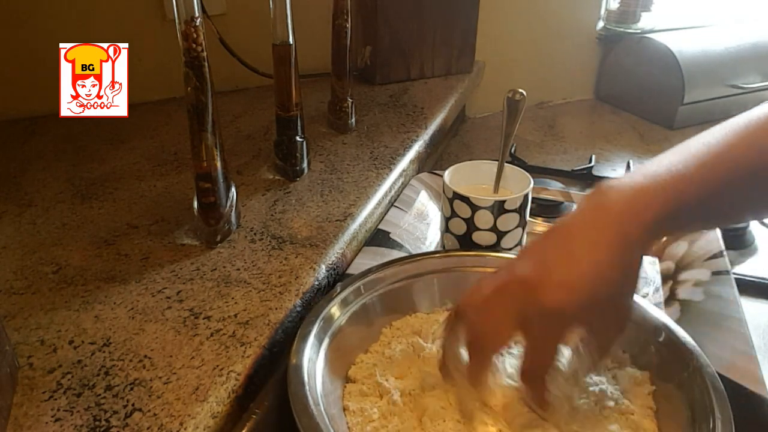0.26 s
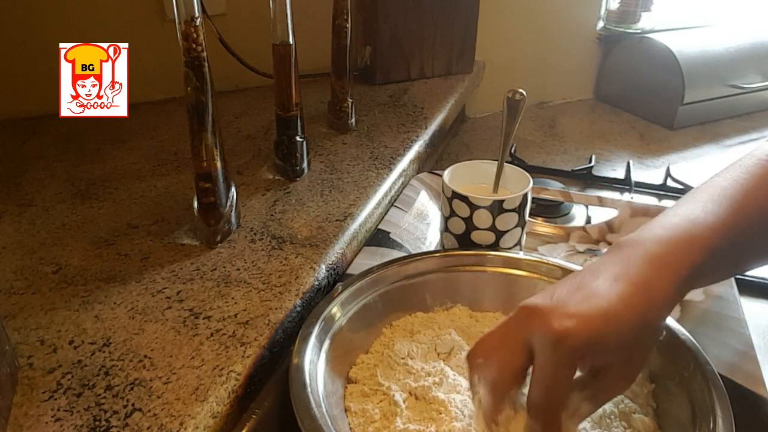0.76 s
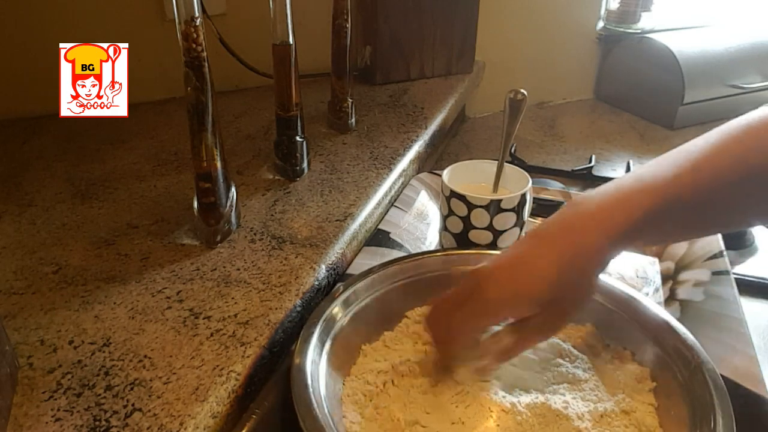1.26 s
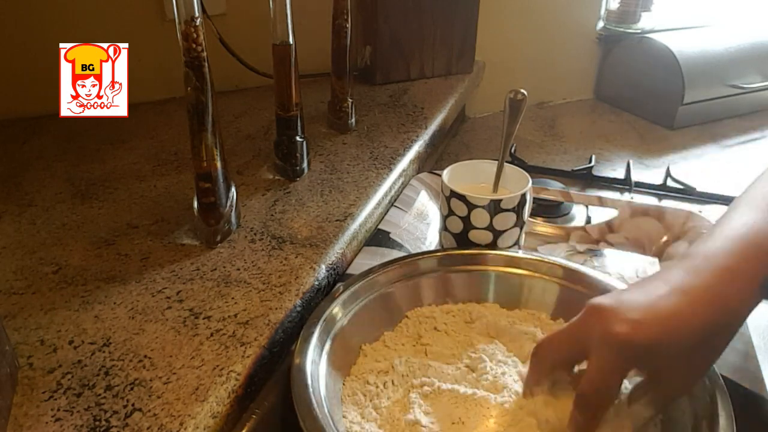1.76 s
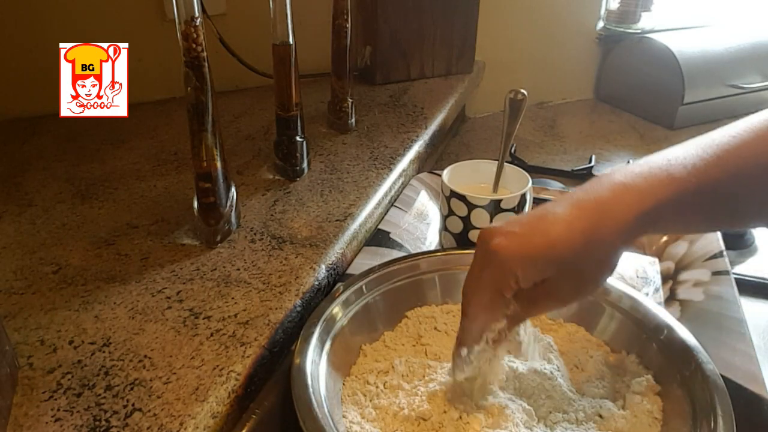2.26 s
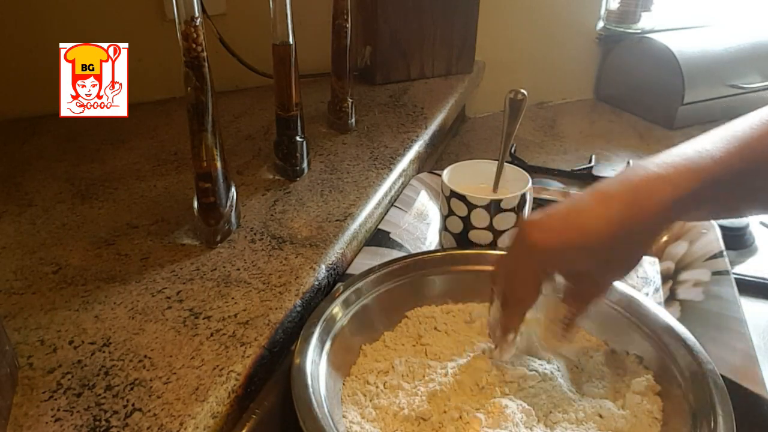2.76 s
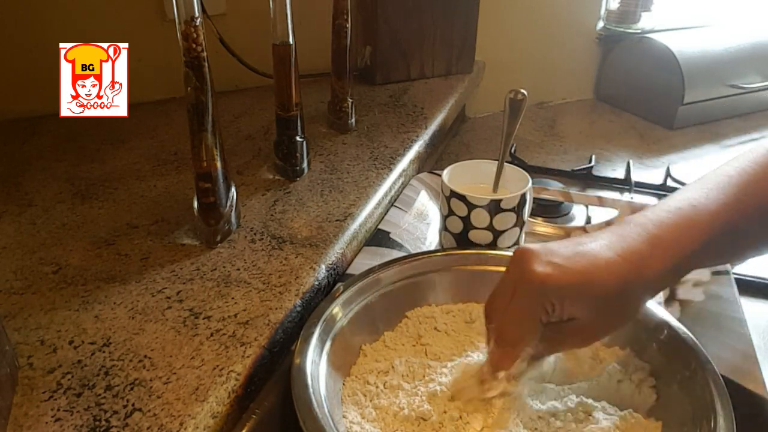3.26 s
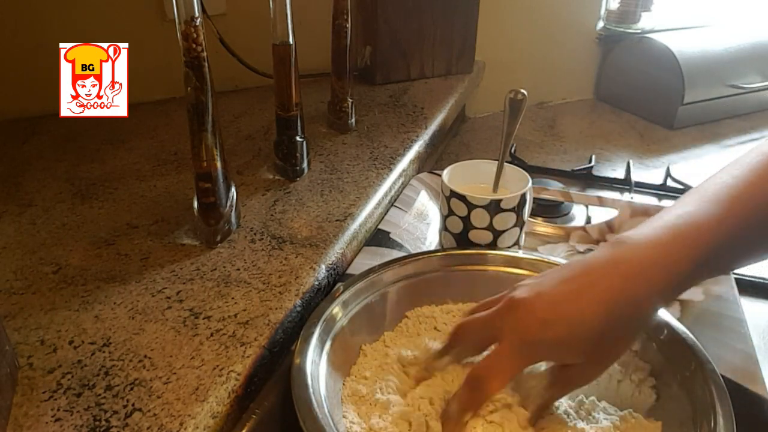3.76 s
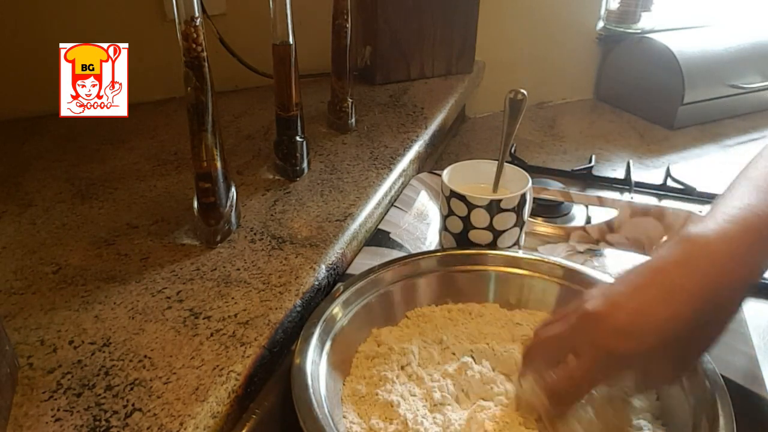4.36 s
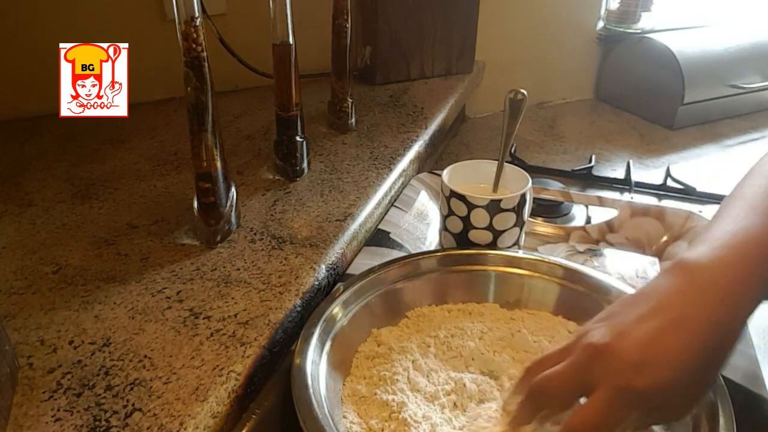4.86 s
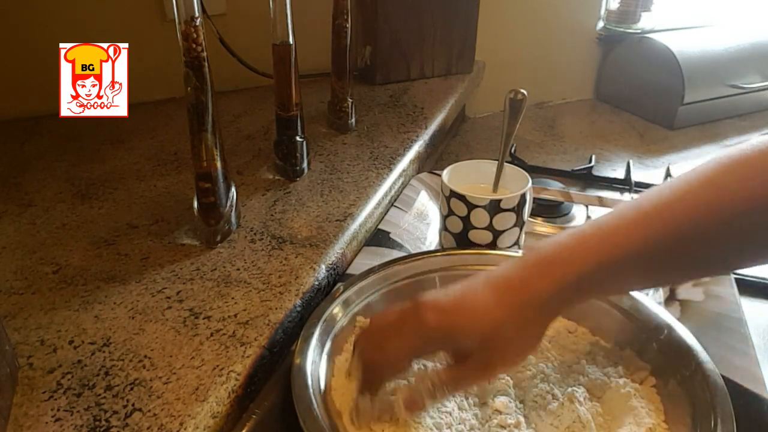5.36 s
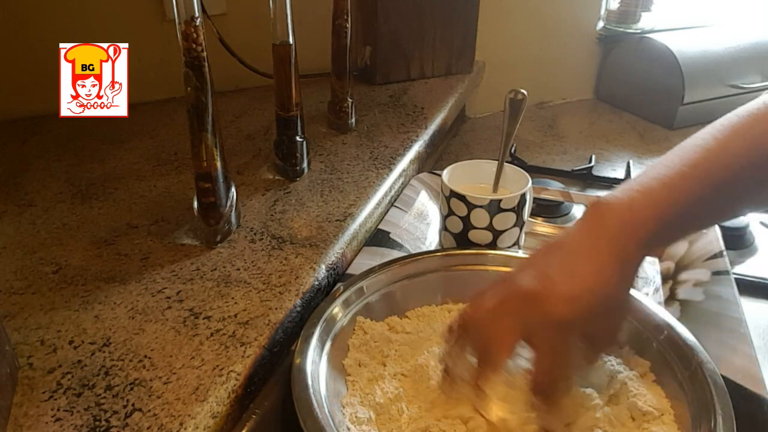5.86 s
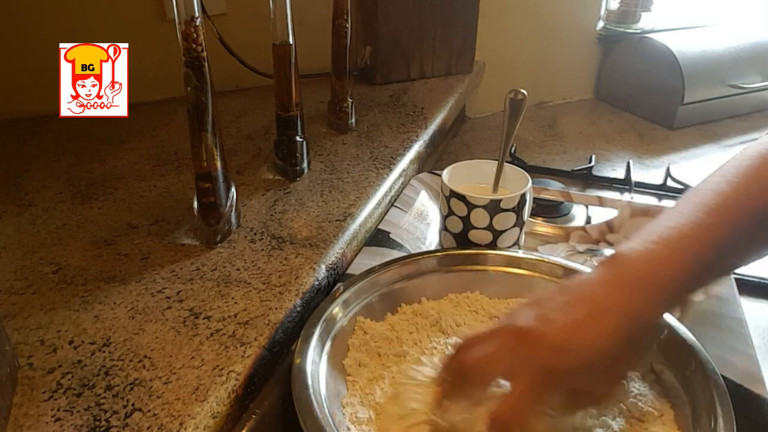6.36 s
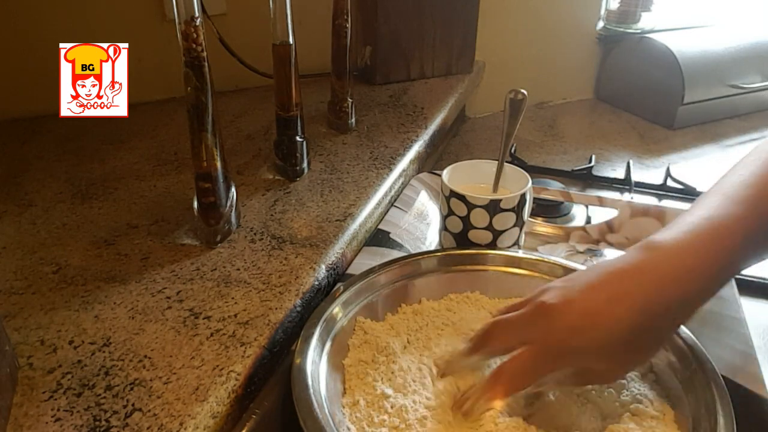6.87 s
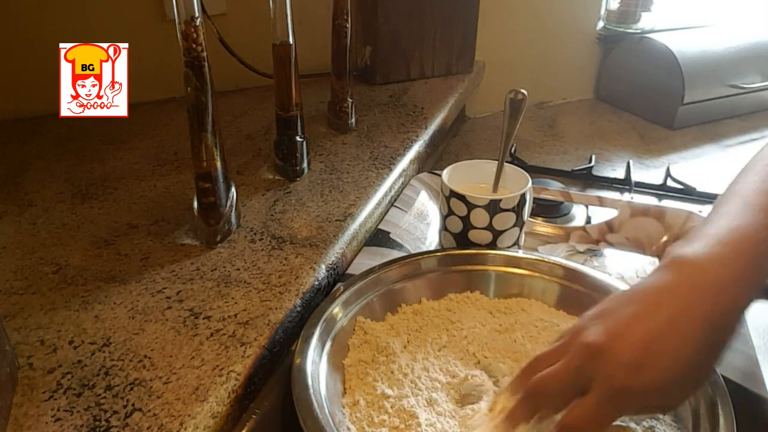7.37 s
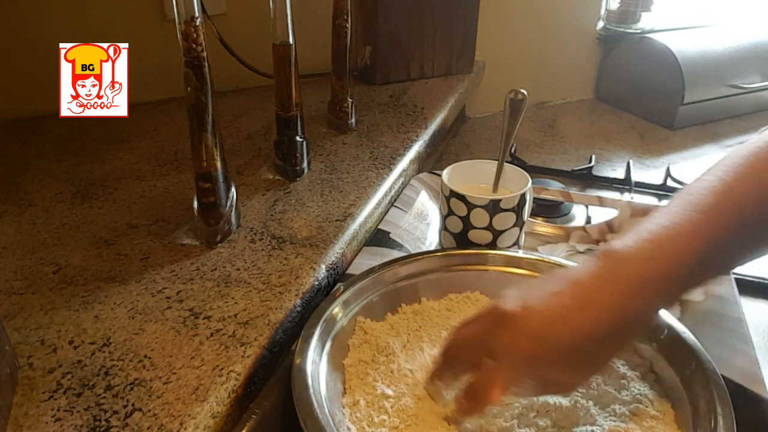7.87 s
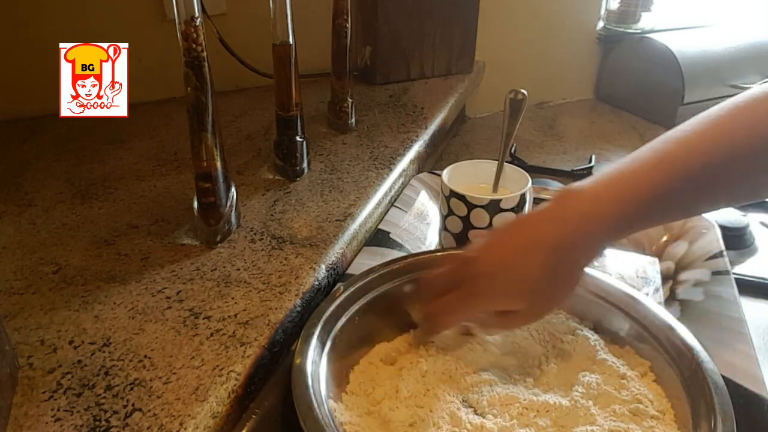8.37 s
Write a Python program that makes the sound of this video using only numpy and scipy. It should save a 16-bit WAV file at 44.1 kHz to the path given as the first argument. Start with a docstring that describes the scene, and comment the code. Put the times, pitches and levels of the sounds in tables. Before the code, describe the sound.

Fingers work dry flour in a damped metal bowl on a kitchen counter, close to a small stereo microphone. Early clanks and scrapes give way to a quiet gap with light brushing. Uneven rubbing then builds into busy, crisp, gritty surges, crumbs ticking on steel and the counter thudding softly, ending in firmer scrapes. A short room echo and low hum sit underneath.

```python
"""A kitchen counter: fingers rub fat into flour in a steel bowl, close to a small stereo microphone.
Flour hiss is coloured noise and crumb clicks; scrapes, knocks and skids ring decaying steel modes.
Crushed grit rasps under the nails and flicked crumbs ping the bowl. Pushes and the drag of the palm
ring low counter modes; shaped noise, a wavering low hum and room resonances lie underneath."""
import sys
import numpy as np
from scipy import signal
from scipy.fft import rfft, irfft, next_fast_len
from scipy.io import wavfile
from scipy.ndimage import uniform_filter1d

SR = 44100
rng = np.random.default_rng(int(sys.argv[2]) if len(sys.argv) > 2 else 0)


def wav_out(sig):
    """Save sig, one row per channel (or a flat mono array), as 16-bit PCM at SR to the path in sys.argv[1]."""
    wavfile.write(sys.argv[1], SR, np.round(np.clip(np.atleast_2d(sig).T, -1, 1) * 32767).astype(np.int16))


N = 379701  # length in samples
OPPOSITE = np.array([[1], [-1]])  # left and right move against each other


def undb(db):
    """dB to gain."""
    return 10 ** (np.asarray(db) / 20)


def level(x, db=0):
    """Set the rms level."""
    return x * undb(db) / np.sqrt(np.mean(x ** 2))


def colour(x, curve):
    """Shape the spectrum along (pitch_hz, level_db) points, joined on a log frequency axis."""
    hz, db = np.transpose(curve)
    size = next_fast_len(N)
    f = np.maximum(np.arange(size // 2 + 1) * SR / size, 1)
    gain = undb(np.interp(np.log(f), np.log(hz), db))
    return irfft(rfft(x, size) * gain, size)[..., :N]


def ring(x, hz, t60):
    """Drive one decaying mode; the result is a complex swing."""
    pole = np.exp((2j * np.pi * hz - np.log(1000) / max(t60, .003)) / SR)
    return signal.lfilter([1], [1, -pole], x)


def walk(rate):
    """Random levels held 1 / rate s and slewed twice; spread near 1."""
    k = int(SR / rate)
    steps = np.repeat(rng.standard_normal(N // k + 1), k)
    return 1.39 * uniform_filter1d(uniform_filter1d(steps, k), k)[:N]


LARGEST_GRAIN = 4.2  # cap on a grain's size, in spreads


def grains(rate, spread_db):
    """Random clicks of either sign, rate per second; a few are much larger than the rest."""
    fall, size, sign = rng.random(N), rng.exponential(size=N), rng.standard_normal(N)
    clicks = (fall < rate / SR) * sign
    return level(clicks * undb(spread_db * np.minimum(size, LARGEST_GRAIN)))


def pair(likeness):
    """Left and right noise that share part of their motion."""
    mid, side = rng.standard_normal((2, N))
    return mid * np.sqrt((1 + likeness) / 2) + side * np.sqrt((1 - likeness) / 2) * OPPOSITE


def sides(pan_db):
    """Left and right gains, pan_db apart."""
    return undb(np.array([pan_db, -pan_db]) / 2)


def ports(swing, k, hz):
    """Each lobed mode reaches the two microphone ports out of step, more so at higher pitch up to a cap."""
    turn = np.exp(.5j * (-1) ** k * min(hz / 330, 1.5))
    return np.array([(swing * turn).imag, (swing / turn).imag])


ROUND = 1.14  # above 1 the top of a swell is rounded


def swells(times, levels_db, swell_db):
    """Summed power, in dB, of events that rise, hold and fall."""
    power = np.full((levels_db.shape[1], N), 1e-18)
    for (s, rise, hold, fall), db in zip(times, levels_db):
        first = max(int((s - 3 * rise) * SR), 0)
        last = min(int((s + hold + 3 * fall) * SR), N)
        t = np.arange(first, last) / SR - s
        drop = (np.maximum(-t / rise, 0) + np.maximum((t - hold) / fall, 0)) ** ROUND
        power[:, first:last] += undb(2 * (db[:, None] - np.outer(swell_db, drop)))
    return 10 * np.log10(power)


# spectrum of the room air: pitch_hz, relative level_db (per Hz)
AIR_CURVE = [(18, -16), (34, -14), (48, -3.5), (103, -5.5), (194, -9.5), (287, -6.5), (426, -20),
             (666, -18), (962, -26.5), (1460, -25), (1910, -29.5), (2170, -26), (9460, -42), (14800, -33.5),
             (16000, -38)]
AIR_DB = -64.5  # rms before the slight pan
# low hum and room resonances: pitch_hz, waver_width_hz, rms level_db
LOW_TONES = [(46.7, 11, -65), (100.3, 4.8, -67), (164, 14, -72.5)]


def kitchen():
    """Room air, most alike left and right in the bass; noise rings the wavering low hum and room resonances."""
    mid, side = colour(rng.standard_normal((2, N)), AIR_CURVE) * undb(1.0 * walk(4.2))
    side = colour(side, [(60, -10.5), (250, -5.5), (1500, 1.0)])
    air = level(mid + side * OPPOSITE, AIR_DB) * sides(-1.1)[:, None]
    tones = 0
    for hz, width_hz, db in LOW_TONES:
        t60 = np.log(1000) / np.pi / width_hz  # a wider resonance dies sooner
        tones = tones + level(ring(rng.standard_normal(N), hz, t60).imag, db)
    return air + tones


# one row per swell of rubbing or of rattle after a knock: full_force_s, rise_s, hold_s, fall_s,
# then relative hiss level_db, steel contact level_db and brightness_db
HAND_SWELLS = [(.005, .05, 0.039, .08, -64, -61, 0), (0.054, 0.046, .15, 0.058, -60.5, -58.5, -1),
               (0.113, 0.062, .005, .04, -52.5, -45, 2), (0.175, 0.034, 0.0086, 0.054, -60, -53, -3.5),
               (0.446, 0.0013, 0.0062, 0.025, -71, -30, 0.5),
               (0.495, 0.068, 0.0084, 0.033, -76, -49.5, -12),
               (0.532, 0.021, .005, 0.041, -46.5, -43.5, -3), (0.593, .006, .01, 0.038, -76, -59, 0),
               (0.618, .04, 0.25, .04, -82, -72, -13.5), (0.644, 0.0065, 0.0089, 0.037, -83, -60.5, -2.5),
               (0.696, 0.0066, 0.0057, 0.049, -84, -70, -2),
               (0.735, 0.0061, 0.018, 0.057, -83, -60.5, -8.5),
               (0.792, 0.0073, .003, 0.055, -84, -54.5, -7), (.866, 0.019, 0.017, 0.026, -71, -46, -5),
               (.96, 0.066, 0.13, .04, -83, -72.5, -2), (1.089, 0.0072, 0.0086, 0.1, -62.5, -58.5, -7),
               (1.127, .01, .005, .03, -63, -52, -9), (1.157, .04, .005, 0.039, -49.5, -51, -10),
               (1.206, 0.025, 0.092, 0.029, -49.5, -40, -1), (1.62, .02, 0.024, 0.12, -62, -86, -3),
               (1.691, 0.08, 0.038, 0.052, -56, -54, 0.5), (1.86, 0.089, 0.011, 0.07, -69, -70, -1.5),
               (1.898, 0.056, .003, 0.039, -65.5, -66, -3), (2.268, 0.05, .003, 0.025, -68, -82, -9),
               (2.644, 0.058, .01, .08, -69, -87, 3), (2.725, 0.098, .03, 0.086, -66.5, -79, -5),
               (3.016, 0.011, .01, 0.11, -62, -66, -6), (3.086, .012, 0.051, 0.045, -58, -51.5, -2.5),
               (3.417, 0.13, .003, 0.043, -71.5, -77, 1), (3.593, .03, 0.054, .05, -72, -86, -2),
               (3.7, 0.068, 0.18, .04, -64.5, -64.5, 1), (3.748, .05, .01, .06, -74, -60, -1),
               (4.092, 0.034, 0.02, 0.069, -68, -67.5, -5), (4.164, .02, .005, 0.031, -67, -68, -7),
               (4.24, .1, .01, .1, -72, -71, -3), (4.325, 0.07, .003, 0.051, -57, -56.5, -1),
               (4.392, 0.042, .003, 0.032, -58.5, -58.5, 4),
               (4.482, 0.026, 0.0024, 0.041, -55.5, -44.5, -4.5),
               (4.609, 0.032, 0.019, 0.063, -63.5, -65, -0.5), (4.68, 0.069, .01, .05, -74, -67, -2.5),
               (4.768, .09, .003, 0.12, -57.5, -59.5, -0.5),
               (4.866, 0.019, 0.048, 0.056, -59.5, -59.5, 1.5),
               (5.012, 0.0088, .003, 0.068, -69, -58.5, -11), (5.06, 0.066, 0.011, 0.055, -66, -66, -9),
               (5.084, .008, .003, 0.049, -64, -50, -3), (5.11, 0.056, 0.074, 0.077, -58.5, -58.5, -2),
               (5.25, .01, .003, 0.017, -76, -77, 0), (5.42, 0.13, 0.024, 0.27, -73, -76, 3),
               (5.496, 0.055, .1, 0.07, -66, -67.5, -3), (5.657, 0.064, 0.011, 0.074, -58, -60, -3),
               (5.708, 0.064, 0.031, 0.12, -59, -56.5, 0), (5.789, 0.023, 0.027, 0.13, -52, -53, 2),
               (5.861, 0.15, 0.034, .045, -58.5, -47.5, -4), (6.18, 0.017, 0.038, 0.12, -48, -44.5, 4),
               (6.246, .1, 0.0046, 0.1, -54, -47, -8.5), (6.332, .05, 0.028, 0.04, -62.5, -52, -3.5),
               (6.382, .04, 0.0045, 0.016, -66, -47.5, -3.5), (6.457, 0.014, 0.051, 0.14, -61, -54, 0.5),
               (6.571, 0.14, 0.07, 0.048, -54.5, -56.5, 0), (6.705, 0.1, 0.0039, 0.073, -57, -64, 3),
               (6.797, .12, .005, .05, -58.5, -61, -1.5), (6.813, .008, 0.019, .03, -70, -58.5, -12.5),
               (6.86, .02, .04, 0.14, -58.5, -56, -0.5), (6.962, 0.14, .005, 0.092, -51, -55.5, -0.5),
               (7.02, .06, .01, .06, -62, -77, -3), (7.074, 0.048, .003, .12, -54.5, -54.5, 3.5),
               (7.183, 0.033, .003, 0.047, -60, -53.5, -5), (7.217, 0.069, .1, 0.061, -50.5, -55.5, 1.5),
               (7.362, .05, .01, 0.054, -60.5, -78, 0), (7.41, 0.041, .01, 0.13, -55.5, -57, 3.5),
               (7.516, 0.05, 0.12, 0.088, -50, -55.5, 2.5), (7.7, .06, .01, .06, -55, -74, -5),
               (7.753, 0.028, .003, .1, -51.5, -57.5, 1.5), (7.811, 0.017, 0.013, .07, -64, -55, 0.5),
               (7.91, 0.13, .005, 0.059, -48.5, -51.5, 0), (8.158, .004, .003, 0.036, -53.5, -49.5, -10),
               (8.221, 0.063, .01, 0.12, -58, -56.5, -5), (8.278, 0.087, 0.042, 0.12, -53, -54, -5.5),
               (8.39, 0.048, 0.0059, .15, -49, -36.5, -2), (8.457, .15, 0.051, 0.093, -49, -44, -1.5),
               (8.546, .08, 0.024, 0.03, -54.5, -43.5, -0.5)]
# how far each level climbs in the rise time and drops in the fall time:
# flour_db, palm_db, fingertips_db, nails_db
SWELL_DEPTHS = (20.8, 26, 23.6, 25)
# relative levels of the idle hand: flour_db, palm_db, fingertips_db, nails_db
IDLE_HAND = (-84, -75, -87, -94.5)
PALM_DB, NAIL_DB = 0.5, -2.5  # offsets from the fingertip level


def rubbing():
    """Swells as four levels in dB: flour hiss, palm, fingertips, nails; bright swells favour the nails."""
    rows = np.array(HAND_SWELLS)
    hiss, steel, bright = rows[:, 4:].T
    palm, nails = steel + PALM_DB - bright, steel + NAIL_DB + bright
    busy = swells(rows[:, :4], np.array([hiss, palm, steel, nails]).T, SWELL_DEPTHS)
    return 10 * np.log10(undb(2 * busy) + undb(2 * np.array(IDLE_HAND))[:, None])


# hiss spectrum: pitch_hz, relative level_db (per Hz)
FLOUR_CURVE = [(1500, -38), (3500, 1), (6000, 0.5), (9000, 1), (11500, -0.5), (14000, -3), (16000, -7.5)]


def flour(hiss_db):
    """Countless dry grains slide over each other in quick surges; crumbs add a faint crackle."""
    crumbs = np.array([grains(880, 2.6) for port in range(2)])
    rub = colour(pair(0.031) + undb(-6.5) * crumbs, FLOUR_CURVE)
    surging = rub * undb(1.17 * walk(75))
    return level(surging, 0.32) * undb(hiss_db)


# modes of the flour-damped steel bowl, low to high: pitch_hz, relative level_db, t60_s
BOWL_MODES = [(250, -4, 0.15), (301.4, 0, 0.052), (350, -13, 0.012), (411, -7, 0.026), (495, -2.5, 0.059),
              (603, 0.5, 0.039), (676.4, 5, 0.035), (763, -3, 0.048), (861, -1.5, 0.043),
              (974, -5.5, 0.054), (1143, -9, 0.072), (1311, 0.5, 0.046), (1447, 0.5, 0.048),
              (1530, 0.5, 0.024), (1640, -7, 0.0076), (1764, 1, 0.033), (1946, -5, 0.017),
              (2355, -10, 0.037), (2602, -10, 0.057), (2780, -15.5, 0.13), (3036, -6, 0.024),
              (3454, -7, 0.031), (3800, -8, 0.024), (4240, -11.5, 0.035), (4560, -3.5, 0.027),
              (4863, -10.5, 0.038), (5490, -20, 0.0075)]


def scrape(modes, contact_db, wander_db):
    """Stick-slip on the steel: dense uneven slips ring the modes while the touched spot wanders."""
    slips = grains(2500, 2.06) * undb(contact_db)
    out, power = 0, 0
    for k, (hz, db, t60) in enumerate(modes):
        smooth = 0.98 * undb(contact_db) * rng.standard_normal(N)
        force = (slips + smooth) * undb(db + wander_db * walk(16))
        out = out + ports(ring(force, hz, t60), k, hz)
        # what a steady unit force stores in the mode
        power += undb(2 * db) * t60 * SR / (4 * np.log(1000))
    return out / np.sqrt(power)


# rasp spectrum: pitch_hz, relative level_db (per Hz)
GRIT_CURVE = [(900, -20.5), (1900, 5), (3200, -2.5), (4700, -5.5), (6000, -19), (9000, -25)]


def grit(rasp_db):
    """Grains crushed under the nails, heard directly: coloured noise and clicks."""
    crushed = colour(pair(0.12) + 0.38 * grains(2500, 3.3), GRIT_CURVE)
    return level(crushed, -4.0) * undb(rasp_db)


def pings(rasp_db):
    """Hard crumbs flick the steel: brief high tones, each from its own spot toward the right."""
    t = np.arange(SR // 40) / SR
    out = np.zeros((2, N + len(t)))
    for at, pitch, size, side in rng.random((5000, 4)):
        hz = 2300 * 5.5 ** pitch
        shape = (t / .004) * np.exp(1 - t / 0.0049)
        swing = np.sin(2 * np.pi * hz * t + np.array([[0], [6 * side]])) * shape
        # a few flicks are far stronger; higher pings are weaker
        strength_db = -2.4 * np.log(1 - size) - 5.0 * pitch
        pan_db = 13.0 * (side - 1.5) * OPPOSITE
        i = int(at * N)
        out[:, i:i + len(t)] += swing * undb(strength_db + pan_db)
    return level(out[:, :N], -2) * undb(rasp_db)


# the bowl pressed on the counter: start_s, then relative low_mode_db, middle_mode_db, upper_mode_db
PUSHES = [(0.098, -53, -55, -65), (0.446, -48, -48, -36), (0.517, -48, -45, -38), (0.759, -63, -46.5, -64),
          (0.869, -61, -58, -66), (1.104, -66, -46, -60), (1.248, -61, -75, -33), (1.737, -67, -47, -47),
          (3.028, -48.5, -44.5, -37), (4.169, -62, -65, -73), (4.29, -52, -66, -66), (4.49, -63, -66, -53),
          (4.742, -56, -78, -69), (5.008, -44.5, -50, -56), (5.369, -59, -73, -72), (5.8, -65, -59, -61),
          (6.181, -52, -65, -64), (6.548, -56, -68, -71), (6.808, -40.5, -43, -65),
          (7.168, -39, -47.5, -46), (7.547, -53, -60, -65), (7.875, -43, -48, -66), (8.153, -55, -51, -42),
          (8.291, -54, -47, -53), (8.395, -52, -66, -30)]
# counter modes: pitch_hz, t60_s, push gain_db, drag gain_db
COUNTER_MODES = [(47.4, 0.46, 17, -42.5), (107, 0.23, 17, -49), (115, 0.53, 2.5, -50.5)]


def counter(press_db):
    """Soft pushes and the drag of the palm ring the low modes of the counter top."""
    out, rows = 0, np.array(PUSHES)
    drag = rng.standard_normal(N) * undb(press_db)
    for k, (hz, t60, push_db, drag_db) in enumerate(COUNTER_MODES):
        push = np.zeros(N)
        push[(rows[:, 0] * SR).astype(int)] = undb(rows[:, k + 1] + push_db) / 2
        soft = np.hanning(int(1.1 * SR / hz))  # the flesh spreads the push over about one swing
        force = np.convolve(push, soft / soft.sum())[:N] + undb(drag_db) * drag
        out = out + ring(force, hz, t60).imag
    # the palm also shakes a heavily damped mode just above them
    out = out + ring(undb(-39.5) * drag, 147.6, 0.12).imag
    return out * sides(-1.8)[:, None]


# knuckles and nails on the steel: start_s, relative level_db, tap pitch_hz, brightness_db
BLOWS = [(.185, -36.5, 460, -11), (.447, -17, 1640, -17), (.456, -28, 1270, -10), (.482, -23, 713, -36),
         (.584, -42.5, 1640, -11), (0.645, -51, 1530, -12), (.699, -56, 1530, -11), (0.743, -45, 1300, -16),
         (.792, -43, 470, -18), (.866, -36, 606, -20), (0.875, -31, 550, -25), (1.088, -45, 724, -17),
         (1.128, -25.5, 598, -25), (1.147, -28, 640, -24), (1.178, -39, 2780, -16), (1.213, -27, 610, -11),
         (1.231, -25, 653, -15), (1.256, -42, 1280, -16), (3.022, -50, 1390, -17), (4.103, -61, 624, -16),
         (4.168, -54, 635, -19), (4.484, -38.5, 1750, -18), (4.905, -46, 794, -13), (5.019, -57, 670, -25),
         (5.087, -38, 980, -12), (5.326, -56, 670, -6), (5.378, -60, 700, -2), (5.435, -67, 2500, -2),
         (5.715, -41.5, 1210, -6), (6.29, -30.5, 543, -31), (6.355, -40, 620, -16), (6.383, -47, 686, -11),
         (6.815, -37, 620, -13), (8.158, -25.5, 627, -20), (8.166, -34.5, 480, -28), (8.387, -26, 616, -20)]
RATTLE_S = 0.0067  # decay time of the chatter in a blow


def knocks():
    """A blow with a few ms of rattle rings all the bowl modes; a tap of a few swings and a crack join it."""
    rows, t = np.array(BLOWS), np.arange(SR // 20) / SR
    spots = rng.standard_normal((len(rows), len(BOWL_MODES)))
    rattles = rng.standard_normal((len(rows), len(t)))
    mode_hz = np.array(BOWL_MODES)[:, 0]
    shapes = [undb(db) * ports(ring(t == 0, hz, t60), k, hz)
              for k, (hz, db, t60) in enumerate(BOWL_MODES)]
    out = np.zeros((2, N + 2 * len(t)))
    for (s, db, tap_hz, bright_db), spot, rattle in zip(rows, spots, rattles):
        hard_hz = 3200 * undb(bright_db / 2)  # a harder, shorter contact reaches higher modes
        gains = undb(1.7 * spot) / (1 + (mode_hz / hard_hz) ** 2)
        blow = (rattle + 5.8 * (t == 0)) * np.exp(-t / RATTLE_S)
        steel = signal.fftconvolve(np.tensordot(gains, shapes, 1), blow[None], axes=1)
        steel *= undb(-9.0) / np.abs(steel).max()
        tap = np.sin(2 * np.pi * tap_hz * t) * (t / 0.0026) * np.exp(1 - t / 0.0021)
        steel[:, :len(t)] += undb(-3.0) * tap
        steel[:, :len(t)] += undb(bright_db - 20) * blow  # the crack of the contact itself
        i = int(s * SR)
        out[:, i:i + steel.shape[1]] += undb(db) * steel
    return out[:, :N]


# a fingertip skidding on bare steel: full_force_s, rise_s, hold_s, fall_s, relative level_db
SQUEALS = [(1.087, .015, .1, .02, -72), (1.204, .012, .015, .005, -56), (8.193, 0.026, 0.045, .04, -62),
           (8.256, .03, .08, .02, -67)]
SKID_HZ, SKID_T60_S = 4630, 0.016


def skids():
    """Short uneven squeals of skin on steel: clicks ring one high mode."""
    rows = np.array(SQUEALS)
    level_db = swells(rows[:, :4], rows[:, 4:], SWELL_DEPTHS[-1:])[0]
    force = grains(280, 1.1) * undb(level_db - 7)
    return ports(ring(force, SKID_HZ, SKID_T60_S), 0, SKID_HZ)


ROOM_T60_S, ROOM_DB = 0.25, -10  # tail decay; send gain before the tail's own colour


def room(dry):
    """Tiled walls return a short, duller tail of decaying noise, different at each port."""
    t = np.arange(int(SR * .6)) / SR
    decay = np.exp(-np.log(1000) * t / ROOM_T60_S)
    tail = rng.standard_normal((2, len(t))) * decay * (t > .004)  # a 4 ms gap first
    tail /= np.sqrt(np.sum(tail ** 2, 1, keepdims=True))
    wet = signal.fftconvolve(dry, tail, axes=1)[:, :N]
    return undb(ROOM_DB) * colour(wet, [(200, -12), (400, 3), (3000, 0.0), (12000, -3.5)])


# stereo balance of the bowl, off to the right: pitch_hz, left_minus_right_db
BOWL_LEAN = [(60, -2), (110, 7), (200, -2), (380, -7.5), (700, -2), (1290, -1), (2380, 0.5), (4400, -0.5),
             (8120, 0), (15000, -6.5)]


def scene():
    """The hand in the bowl, its echo, the counter and the kitchen."""
    hiss_db, press_db, scrape_db, rasp_db = rubbing()
    chatter_db = 2.5 * walk(70)  # the fingers catch and let go
    palm = scrape(BOWL_MODES[:10], press_db + chatter_db - 6.0, 3.28)
    fingertips = scrape(BOWL_MODES[10:17], scrape_db + chatter_db - 5.0, 2.5)
    nails = scrape(BOWL_MODES[17:], rasp_db + chatter_db - 8.0, 2.7)
    steel = palm + fingertips + nails + knocks() + skids()
    # a small bowl radiates little below its first mode
    steel = signal.sosfilt(signal.butter(8, 228, "high", fs=SR, output="sos"), steel)
    crumbs = pings(np.minimum(rasp_db, hiss_db + 1))  # crumbs fly only where flour moves
    hand = steel + flour(hiss_db) + grit(rasp_db + chatter_db) + crumbs
    left = colour(hand[0], [(hz, db / 2) for hz, db in BOWL_LEAN])
    right = colour(hand[1], [(hz, -db / 2) for hz, db in BOWL_LEAN])
    hand = np.array([left, right])
    return hand + room(hand) + counter(press_db) + kitchen()


TOP_HZ = 15780


def record(dry):
    """The microphone drops the deepest bass; the recorder cuts the top steeply."""
    dry = signal.sosfilt(signal.butter(6, 39, "high", fs=SR, output="sos"), dry)
    return signal.sosfilt(signal.ellip(12, .2, 60, TOP_HZ, fs=SR, output="sos"), dry)


dry = scene()
out = record(dry)
wav_out(out)
```